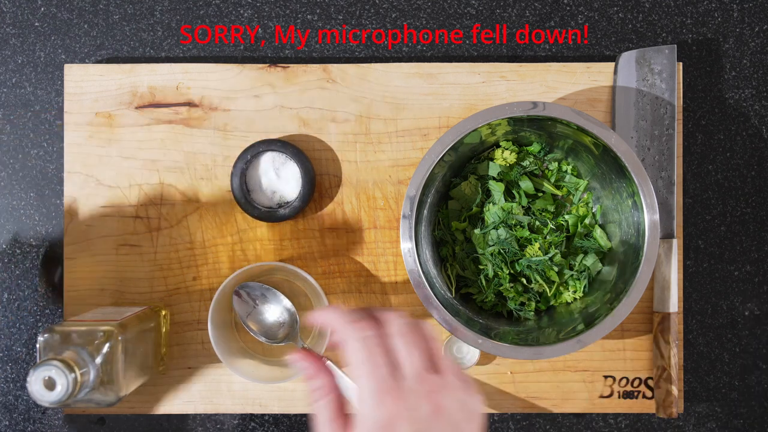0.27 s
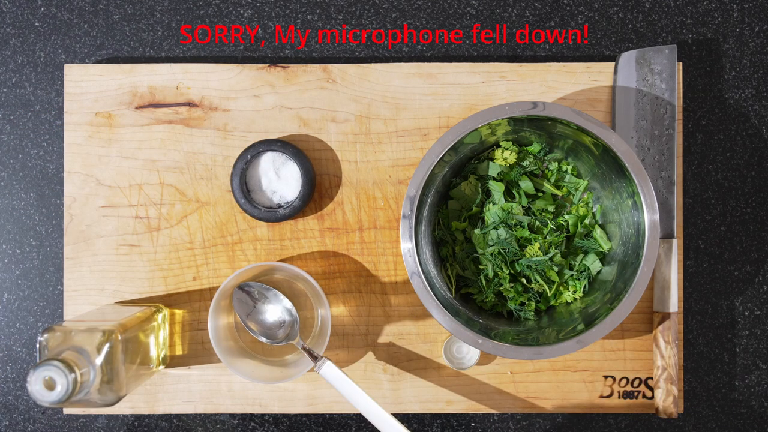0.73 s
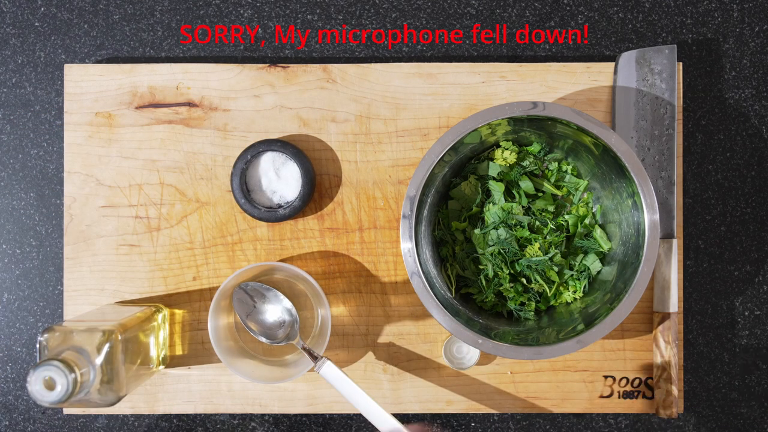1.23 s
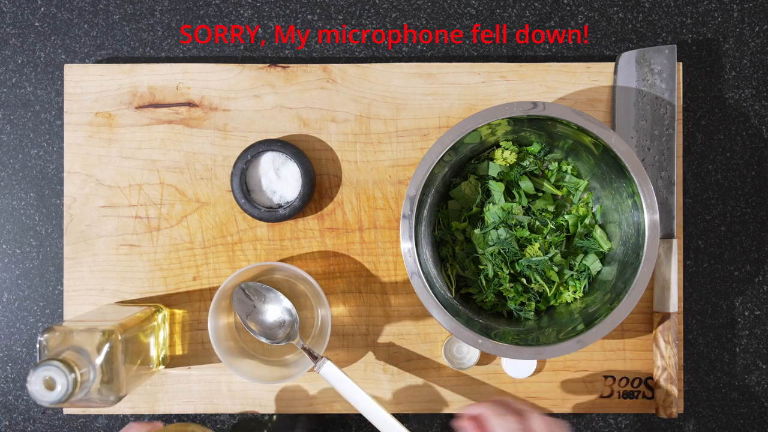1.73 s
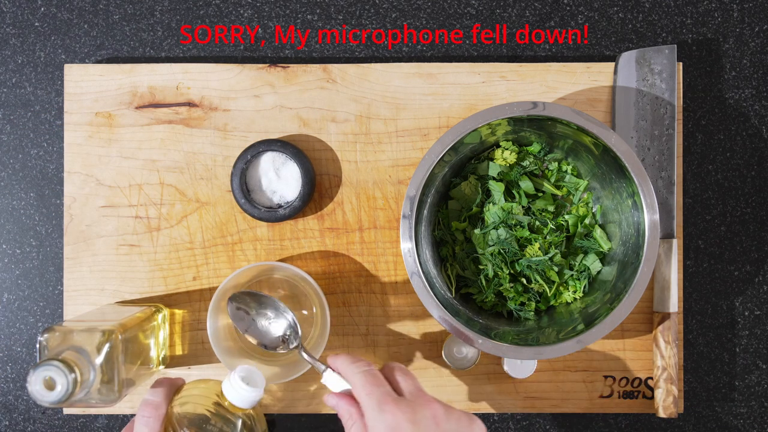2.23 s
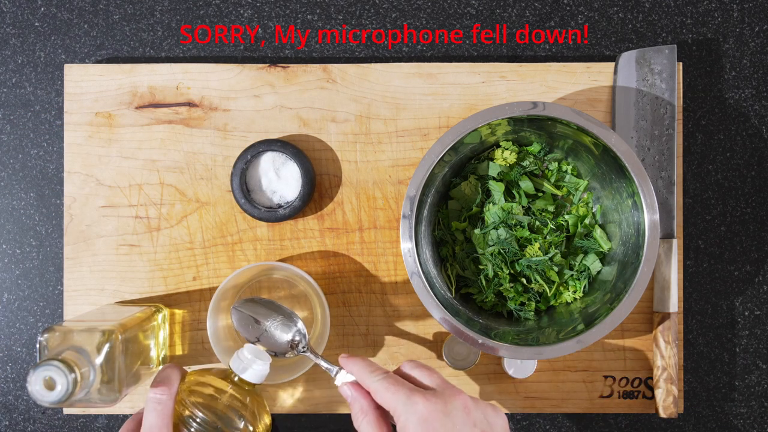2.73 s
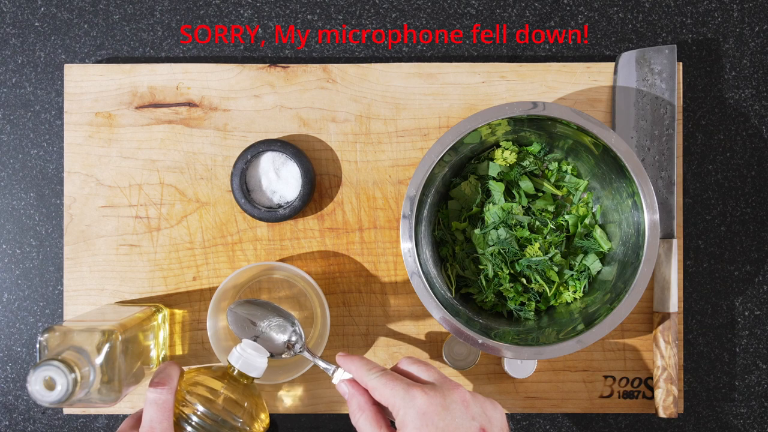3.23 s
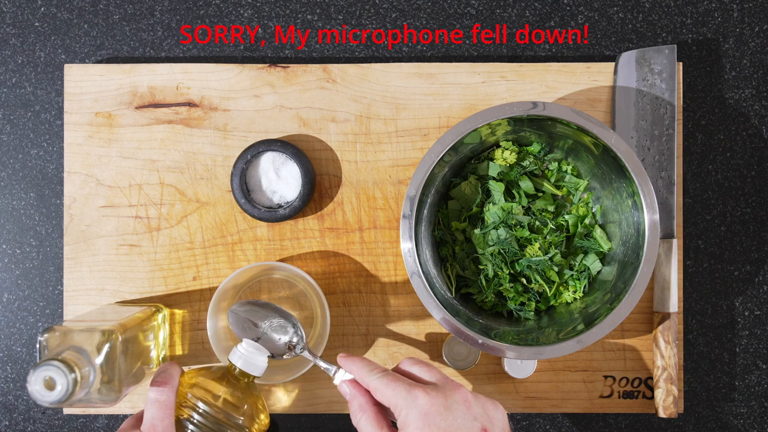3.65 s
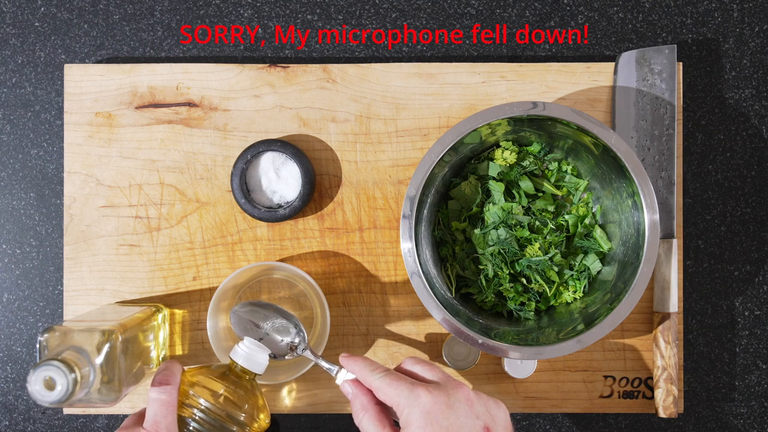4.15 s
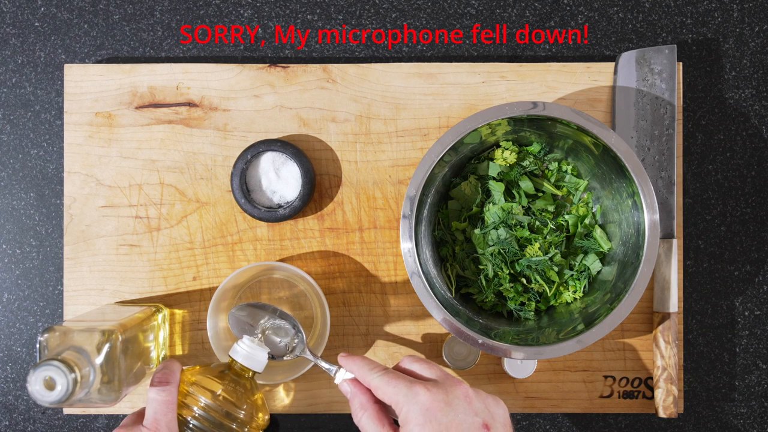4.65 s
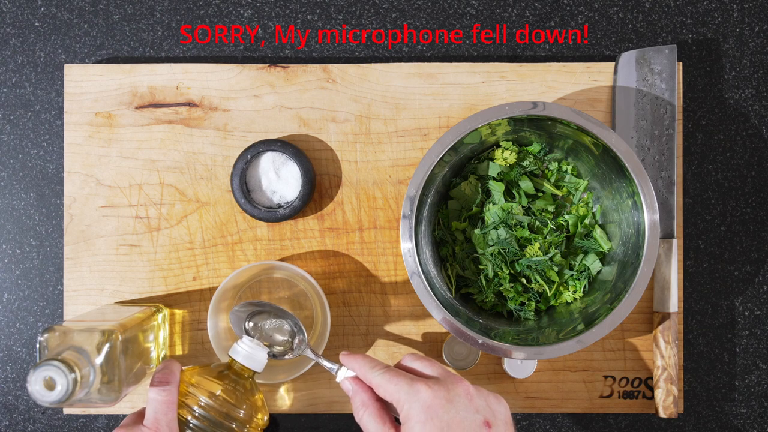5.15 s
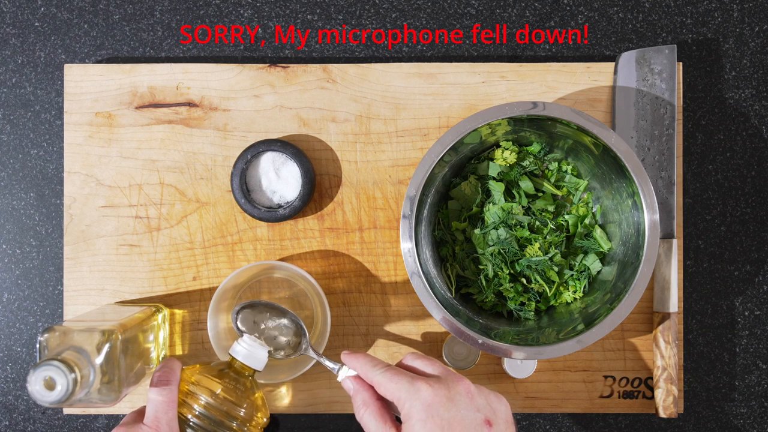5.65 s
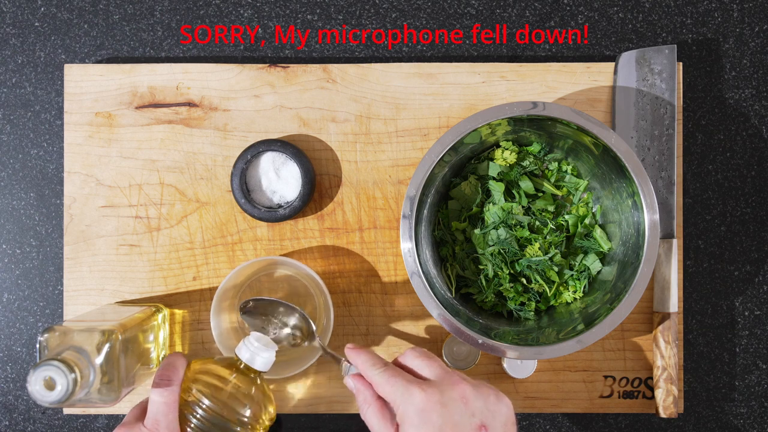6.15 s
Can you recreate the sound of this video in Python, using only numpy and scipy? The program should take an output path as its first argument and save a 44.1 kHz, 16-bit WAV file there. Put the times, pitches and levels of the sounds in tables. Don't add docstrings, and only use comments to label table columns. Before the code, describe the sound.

Very close, muffled clothing noise: a short stuttering rub and thud, lighter rustles, then a crisp cap knock on a board in a small kitchen. Right after, fabric jerks violently against the microphone, thumping, scratching and cracking. It settles with ticks and a soft swish into quiet room tone and faint fridge hum, broken only by a few tiny ticks and weak low tugs.

```python
import sys
import numpy as np
from scipy import signal
from scipy.fft import rfft, irfft
from scipy.io import wavfile
from scipy.ndimage import uniform_filter1d

SR = 44100
rng = np.random.default_rng(int(sys.argv[2]) if len(sys.argv) > 2 else 0)


def to_wav(sig):
    pcm = np.clip(np.atleast_2d(sig), -1, 1) * 32767
    pcm = np.round(pcm).astype(np.int16)
    wavfile.write(sys.argv[1], SR, pcm.T)


def volts_from_db(level):
    exponent = np.asarray(level, float) / 20
    return 10 ** exponent


N = 281534


def unit(x):
    return x / np.sqrt(np.mean(x ** 2))


def colour(x, points):
    hz, db = np.transpose(points)
    size = 8192
    grid = np.maximum(np.fft.rfftfreq(size, 1 / SR), 1)
    gain_db = np.interp(np.log(grid), np.log(hz), db)
    cepstrum = irfft(np.log(volts_from_db(gain_db)))
    cepstrum[1:size // 2] *= 2
    cepstrum[size // 2 + 1:] = 0
    impulse = irfft(np.exp(rfft(cepstrum)))
    return signal.fftconvolve(x, impulse)[:len(x)]


def band(x, lo_hz, hi_hz, order=2):
    return signal.sosfilt(signal.butter(order, [lo_hz, hi_hz], "band", fs=SR, output="sos"), x)


def walk(rate):
    hold = int(SR / rate)
    steps = np.repeat(rng.standard_normal(N // hold + 1), hold)
    return 1.73 * uniform_filter1d(uniform_filter1d(steps, hold), hold)[:N]


def ring(hz, t60, length=.25):
    t = np.arange(int(length * SR)) / SR
    return np.sin(2 * np.pi * hz * t) * np.exp(-np.log(1000) * t / t60)


def add(out, s, x):
    i = int(s * SR)
    out[i:i + len(x)] += x[:len(out) - i]


def slips(rate, spread_db):
    happens = rng.random(N) < rate / SR
    size = np.minimum(rng.exponential(size=N), 3.5)
    sign = np.where(rng.random(N) < .7, -1., 1.)
    return happens * volts_from_db(spread_db * size) * sign


def strokes(table):
    edge_db, roundness = -18.5, 1.45
    power = np.zeros((2, N))
    for peak, rise, fall, db, other_db in table:
        rise, fall = max(rise, .003), max(fall, .003)
        first = max(int((peak - 3 * rise) * SR), 0)
        last = min(int((peak + 3 * fall) * SR), N)
        t = np.arange(first, last) / SR - peak
        distance = np.where(t < 0, -t / rise, t / fall)
        shape = volts_from_db(db + edge_db * distance ** roundness) ** 2
        power[:, first:first + len(t)] += shape * volts_from_db(np.array([[0], [other_db]])) ** 2
    return power


def scrapes():
    # start_s, end_s, first_scratch_db, last_scratch_db, hiss_over_scratch_db
    drags = [
        (.231, 0.264, -38, -40.5, -13),
        (1.927, 1.966, -27, -22, -14),
        (1.973, 2.017, -29.5, -34.5, -12),
    ]
    catch_s = 0.005
    t = np.arange(N) / SR
    power = np.zeros((2, N))
    for start, end, first_db, last_db, hiss_db in drags:
        edges = np.clip(np.minimum(t - start, end - t) / catch_s + .5, 0, 1) ** 2
        drag_db = np.interp(t, [start, end], [first_db, last_db])
        power += (edges * volts_from_db(drag_db + np.array([[0], [hiss_db]]))) ** 2
    return power


def cloth():
    # time_s, contact_db
    contact = [(0, -53), (.1, -49.5), (.19, -42.5), (.212, -48.5), (.33, -55.5), (.9, -64), (1.12, -64),
               (1.27, -58.5), (1.43, -66.5), (1.6, -56), (1.68, -57), (1.9, -42.5), (2.03, -53),
               (2.075, -63), (2.095, -53.5), (2.44, -57.5), (2.47, -62), (2.9, -77)]
    rest_db = [-1, 0.5, -3.5, -11.5]
    # peak_s, rise_s, fall_s, bump_db,
    # rub_over_bump_db
    tugs = [(.09, 0.022, .04, -42, -6), (.15, 0.058, 0.063, -37, -12), (.198, 0.011, .02, -27, -15),
            (.212, 0.019, 0.017, -38, 4.5), (.232, 0.0056, 0.025, -38, 1.5),
            (.264, 0.0089, 0.023, -32, -15.5), (.677, 0.028, .03, -49.5, -14),
            (.839, 0.072, 0.11, -52.5, -14), (.954, 0.037, 0.11, -49, -11), (1.042, 0.077, 0.065, -54.5, 5),
            (1.11, 0.047, .012, -51, -4.5), (1.32, 0.032, 0.045, -48.5, -5.5), (1.46, 0.04, 0.045, -60, 1),
            (1.505, 0.015, 0.044, -49, -5), (1.556, 0.045, 0.056, -47, -6), (1.746, 0.048, 0.037, -54, 4),
            (1.816, 0.033, 0.091, -42, 3), (1.904, 0.007, 0.029, -29.5, -21), (1.94, 0.019, 0.021, -18, -6),
            (1.99, 0.022, 0.036, -22, -7.5), (2.046, 0.016, 0.026, -45.5, 1), (2.1, 0.023, 0.11, -42, -2.5),
            (2.22, 0.16, 0.11, -44.5, -11), (2.438, 0.032, 0.038, -56, -14),
            (2.617, 0.057, .03, -64, 3), (3.222, 0.078, 0.034, -64, 2.5), (3.31, 0.044, 0.08, -63, -1),
             (6.178, 0.094, 0.066, -54.5, -5.5), (6.24, 0.036, 0.11, -53, -1.5),
             (6.36, .07, 0.09, -49.5, -2.5)]
    # peak_s, rise_s, fall_s, scratch_db, hiss_over_scratch_db
    slides = [(.084, 0.042, 0.051, -47, -10.5), (.15, 0.043, .05, -45, -14), (.197, .04, .012, -47, -16),
              (.24, 0.0073, 0.0074, -41, -17), (.28, 0.021, 0.06, -50, -11),
              (.954, 0.05, 0.045, -58.5, -19), (1.042, 0.088, .03, -60, -20),
              (1.166, 0.029, 0.2, -58.5, -11), (1.284, .03, 0.1, -54.5, -14), (1.477, 0.024, .02, -61, -14),
              (1.516, 0.014, .03, -55, -10), (1.556, 0.035, 0.064, -57, -7), (1.69, 0.053, 0.25, -55, -18),
              (1.76, 0.066, 0.071, -53, -8.5), (1.95, .015, .012, -24.5, -14),
              (1.968, .004, 0.0067, -37, -10), (2.022, .006, 0.0066, -43, -8), (2.23, .04, .06, -63, 0),
              (2.14, 0.04, 0.041, -52.5, -20), (2.18, .011, 0.081, -64, -1),
              (2.27, 0.043, 0.21, -51, -13.5), (2.435, 0.11, .03, -57.5, -12), (6.24, .05, 0.081, -64, -11),
              (6.38, 0.097, .05, -56.5, -8)]
    # freq_hz, density_db (dB per Hz)
    bump_tone = [(18, -49), (30, -17.5), (91, 1), (192, 1), (306, -2), (347, -1), (380, -6.5), (450, -2.5),
                 (580, -32), (990, -120)]
    # freq_hz, density_db (dB per Hz)
    scratch_tone = [(710, -20), (1200, -11), (1290, -8.5), (1540, -18), (1750, 2.5), (2440, 3.5), (2930, 7),
                    (3370, -0.5), (7000, -22.5), (9100, -61), (15400, -120)]
    # freq_hz, density_db (dB per Hz)
    brush_tone = [(710, -32), (1200, -7.5), (1800, -3.5), (1980, -4), (2440, -5), (3350, -3.5),
                  (7000, -21.5), (9100, -45.5), (15400, -120)]
    # freq_hz, density_db (dB per Hz)
    hiss_tone = [(2940, -17), (5000, 0), (6800, -8.5), (8900, -11.5), (10400, -15.5), (13200, -21),
                 (15800, -24.5)]
    slide_rub_db = -0.5
    heave_db = -31.5
    hard_db = -49.5
    vent_hz = 48

    pull, pull_rub = strokes(tugs)
    slide, slide_hiss = strokes(slides) + scrapes()
    moved = np.array([pull, pull_rub + volts_from_db(slide_rub_db) ** 2 * slide, slide, slide_hiss])
    contact_db = np.interp(np.arange(N) / SR, *np.transpose(contact))
    resting = volts_from_db(contact_db + np.array(rest_db)[:, None]) ** 2
    gains = np.sqrt(moved + resting)

    jerks, fibres, grip = slips(900, 2.38), slips(9000, 3.3), walk(140)
    bump = unit(colour(jerks, bump_tone)) * volts_from_db(1.18 * walk(30))
    heave = gains[0] / (gains[0] + volts_from_db(heave_db))
    bump = bump + volts_from_db(-4.5) * heave * unit(band(jerks, 48, 82, order=3))
    rub = unit(band(0.26 * jerks + slips(4000, 1.42), 372, 1320)) * volts_from_db(1.27 * grip)
    hard = gains[2] / (gains[2] + volts_from_db(hard_db))
    digging = hard * unit(colour(fibres, scratch_tone))
    brushing = (1 - hard) * unit(colour(fibres, brush_tone))
    scratch = (digging + brushing) * volts_from_db(1.4 * grip)
    hiss = unit(colour(fibres + 1.2 * rng.standard_normal(N), hiss_tone)) * volts_from_db(1.05 * grip)
    vent = signal.butter(2, vent_hz, "high", fs=SR, output="sos")
    return signal.sosfilt(vent, (gains * np.array([bump, rub, scratch, hiss])).sum(axis=0))


def kitchen():
    # freq_hz, density_db (dB per Hz)
    air_tone = [(12, -43), (20, -28), (65, -15), (162, -6.5), (317, -8), (354, -3), (419, -7.5),
                (456, -6.5), (673, -6), (753, -8.5), (941, -6.5), (1350, -8.5), (1740, -14), (4130, -19),
                (15800, -37.5)]
    # pitch_hz, level_db (rms)
    fridge = [
        (39, -84.5),
        (344.5, -82),
        (463, -75),
    ]
    air_db, waver_db = -59, 2.0
    out = unit(colour(rng.standard_normal(N), air_tone)) * volts_from_db(air_db + .3 * walk(2.69))
    t = np.arange(N) / SR
    for hz, db in fridge:
        out += np.sqrt(2) * volts_from_db(db + waver_db * walk(3.6)) * np.sin(2 * np.pi * hz * t)
    return out


def ticks():
    # time_s, peak_db, sign (push or pull), top_hz
    snaps = [(0.0315, -36.4, 1, 4740), (0.0617, -24.2, -1, 3400), (0.2855, -28.8, -1, 4220),
             (0.6708, -43.9, 1, 3750), (0.8459, -43.1, -1, 3320), (0.9251, -39.4, 1, 3140),
             (0.9592, -39.1, 1, 3100), (1.0137, -37.5, 1, 1460), (1.0347, -41.8, -1, 2200),
             (1.0513, -38.1, 1, 1590), (1.0995, -38.4, 1, 2450), (1.4583, -40, -1, 1640),
             (1.5159, -42, -1, 4050), (1.6727, -39.5, 1, 4610), (1.8203, -20.5, 1, 1300),
             (2.0956, -32.1, -1, 2600), (2.1057, -32.0, -1, 2280), (2.1409, -32.5, -1, 3790),
             (2.1826, -28, -1, 5000), (2.5062, -43.8, -1, 3190), (2.6156, -46.1, 1, 3570),
             (3.2113, -42, 1, 4200), (3.2936, -44.1, -1, 3750), (5.522, -43.5, -1, 3060),
             (5.7496, -48.6, -1, 2840), (6.123, -46.5, -1, 1940), (6.1599, -42, -1, 2000),
             (6.3448, -36, -1, 1800), (6.3706, -40.7, -1, 1640)]
    vent = signal.butter(1, 350, "high", fs=SR, output="sos")
    out = np.zeros(N)
    cavity = volts_from_db(-37.0) * ring(3000, 0.0116, length=.01)
    cavity[0] += 1
    for s, db, sign, hi_hz in snaps:
        width = int(1.1 * SR / hi_hz) + 2
        jolt = np.convolve(np.hanning(width) ** 2, cavity)
        jolt = signal.sosfilt(vent, jolt)
        add(out, s - width / 2 / SR, sign * volts_from_db(db + 2.5) * jolt / abs(jolt).max())
    return out


def judder():
    # time_s, level_db
    series = [(0.076, -63), (0.087, -35.5), (0.129, -66), (0.164, -41), (.196, -35), (.201, -27),
              (0.213, -27.5), (0.223, -26.5), (0.23, -50)]
    jump_hz = [150, 170, 190, 220, 270, 370, 330, 250, 250]
    s, db = np.transpose(series)
    t = np.arange(int(s[0] * SR), int(s[-1] * SR)) / SR
    rate_hz = np.interp(t, s, jump_hz) * (1 + 0.143 * walk(147.0)[:len(t)])
    phase = np.cumsum(rate_hz) / SR
    swing = -np.exp(1.7 * np.cos(2 * np.pi * phase)) * volts_from_db(2.2 * walk(121.0)[:len(t)])
    out = np.zeros(N)
    add(out, s[0], unit(band(swing, 80, 1400)) * volts_from_db(np.interp(t, s, db)))
    return out


def squeak():
    # start_s, end_s, pitch_hz, width_hz, level_db
    cries = [
        (.192, .223, 12100, 120, -62),
        (.196, .224, 10750, 120, -62),
        (1.733, 1.757, 640, 160, -44),
        (1.788, 1.8, 800, 300, -44),
        (2.205, 2.245, 9500, 4000, -66),
    ]
    out = np.zeros(N)
    for start, end, hz, width_hz, db in cries:
        n = int((end - start) * SR)
        tone = band(rng.standard_normal(n), hz - width_hz / 2, hz + width_hz / 2, order=1)
        add(out, start, volts_from_db(db) * np.hanning(n) ** .4 * unit(tone))
    return out


def thumps():
    # time_s, peak_db, pitch_hz
    knocks = [(0.264, -19, 117), (0.389, -41, 80.7), (0.429, -34, 272), (0.528, -36, 170),
              (0.659, -42, 161), (0.829, -47, 51.1), (1.041, -31.5, 229), (1.099, -36, 119),
              (1.308, -40, 118), (1.51, -33.5, 153), (1.54, -29, 147), (1.721, -42, 153), (1.821, -26, 110),
              (1.902, -14, 132), (1.996, -15, 134), (2.098, -24.5, 312), (2.139, -31, 191),
              (2.248, -36, 86.6), (2.317, -39, 125), (2.431, -53, 135), (2.58, -37.5, 343),
              (3.337, -46, 103), (4.018, -47, 164), (6.24, -45, 137), (6.348, -50, 99.6)]
    out = np.zeros(N)
    for s, db, hz in knocks:
        swing = ring(hz, 4.5 / hz)
        onset = np.minimum(np.arange(len(swing)) * hz / SR / 0.53, 1)
        add(out, s, -volts_from_db(db) * swing * onset)
    return out


def cap():
    hit_s = [1.6201, 1.6277, 1.6309, 1.6535]
    # level_db, cap_ring_share (0-1)
    hits = [
        (-5.5, 0.71),
        (-22, 0.3),
        (-19, 0.1),
        (-32, 0.05),
    ]
    mode_hz = [834, 1372, 1733, 2266, 2697, 2760, 3262, 3698, 4690, 4640, 7030, 9500, 12900]
    mode_sense = [-1, 1, -1, 1, -1, -1, 1, -1, 1, 1, -1, 1, -1]
    # level_db, t60_s
    modes = [(-26, 0.0054), (-24, 0.01124), (-17.5, 0.0054), (-13, 0.00626), (-17, 0.012), (-48.5, 0.38),
             (-11, 0.0097), (-8, 0.0034), (-0.5, 0.019), (-47.5, 0.46), (-13, 0.014), (-21, .011),
             (-27.5, .008)]
    # freq_hz, gain_db
    muffle = [(100, 6.5), (4000, 3), (4850, -1.05), (5150, -14.5), (8000, -14.5), (16000, -21.5)]
    blur_per_s = 160
    room_t60_s, room_db = 0.55, -22.5

    out = np.zeros(N)
    length = int(.25 * SR)
    rise = np.clip(np.arange(length) / 9.2, 0, 1)
    for s, (hit_db, share) in zip(hit_s, hits):
        body = np.zeros(length)
        for hz, sense, (mode_db, t60) in zip(mode_hz, mode_sense, modes):
            mode = volts_from_db(hit_db + mode_db) * ring(hz, t60) * sense
            if t60 > .1:
                mode = mode * walk(blur_per_s)[:length]
            if hz > 4000:
                mode = mode * share
            body += mode
        add(out, s, body * np.sin(np.pi / 2 * rise) ** 2)
    out = colour(out, muffle)
    t = np.arange(int(.5 * SR)) / SR
    tail = rng.standard_normal(len(t)) * np.exp(-np.log(1000) * t / room_t60_s) * (t > .012)
    return out + volts_from_db(room_db) * signal.fftconvolve(out, tail / np.sqrt(np.sum(tail ** 2)))[:N]


def seam_crack():
    crack_s, crack_db, crack_ms = 1.9601, -1.6, .22
    out = np.zeros(N)
    width = int(crack_ms * SR / 1000) + 2
    push = np.pad(np.hanning(width), (0, 300))
    add(out, crack_s, volts_from_db(crack_db) * band(push, 370, 12000, order=1))
    return out


def scene():
    handling = cloth() + ticks() + judder() + squeak() + thumps() + seam_crack()
    return (handling + kitchen() + cap())[None, :]


def roll_off(x):
    return signal.sosfilt(signal.butter(12, 15920, fs=SR, output="sos"), x)


def record(dry):
    top = signal.ellip(10, .2, 80, 15700, fs=SR, output="sos")
    mix = signal.sosfilt(top, dry)
    return roll_off(mix)


dry = scene()
out = record(dry)
to_wav(out)
```